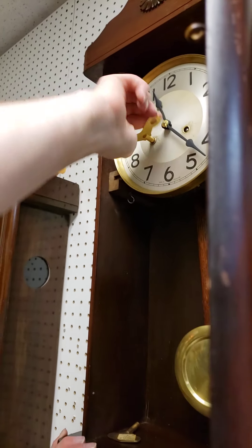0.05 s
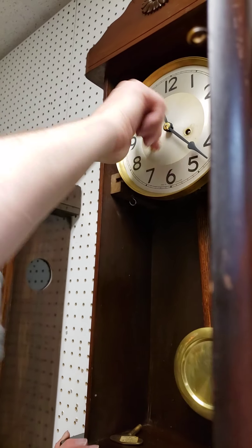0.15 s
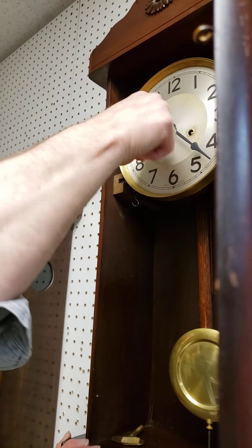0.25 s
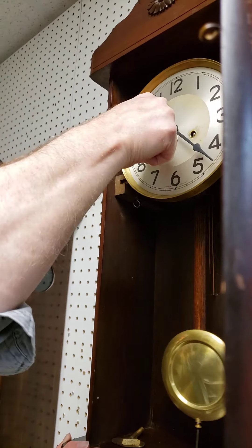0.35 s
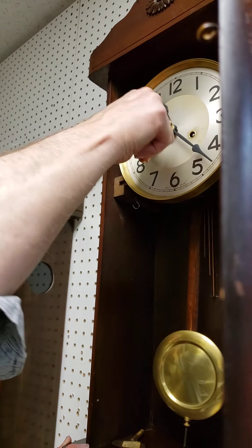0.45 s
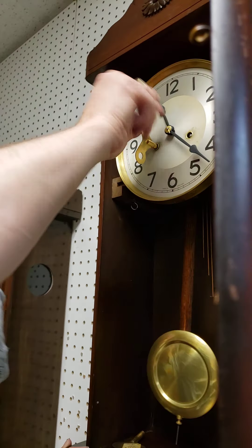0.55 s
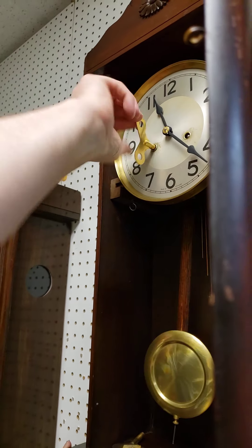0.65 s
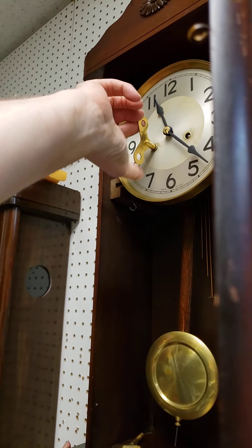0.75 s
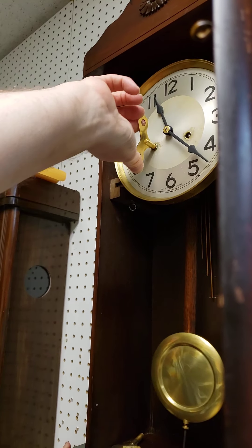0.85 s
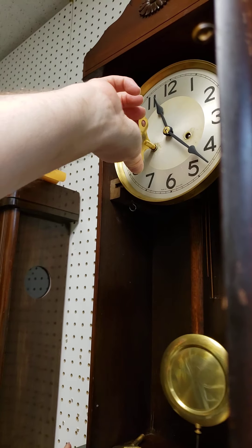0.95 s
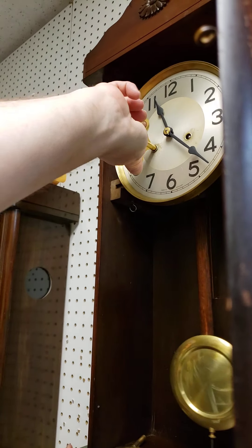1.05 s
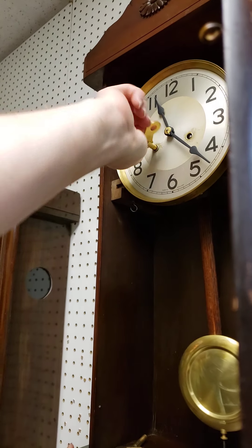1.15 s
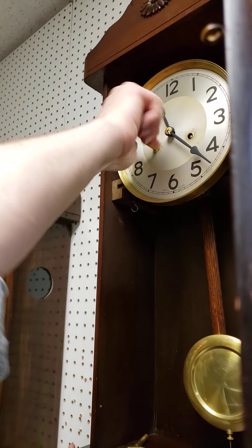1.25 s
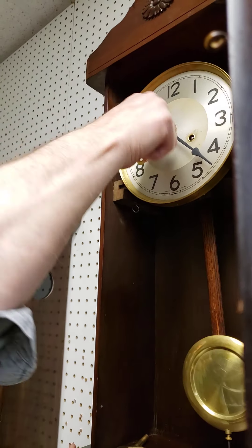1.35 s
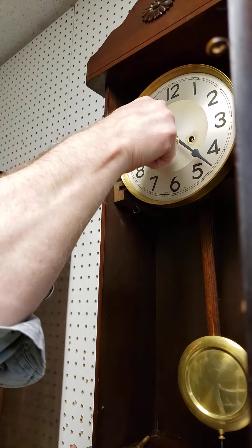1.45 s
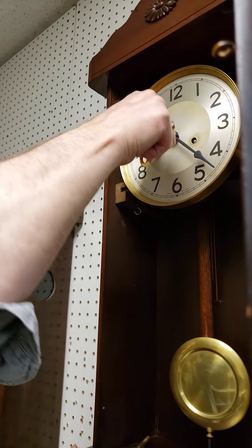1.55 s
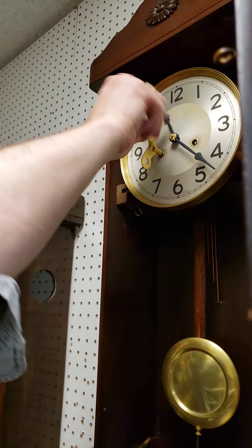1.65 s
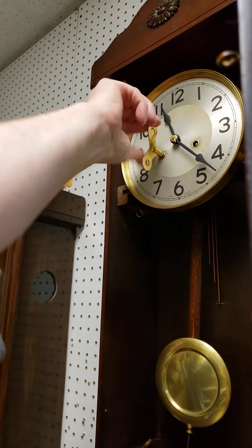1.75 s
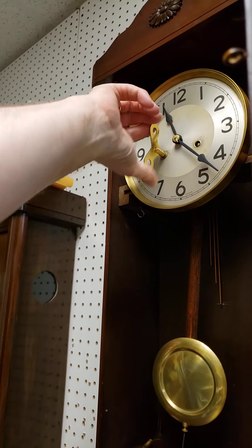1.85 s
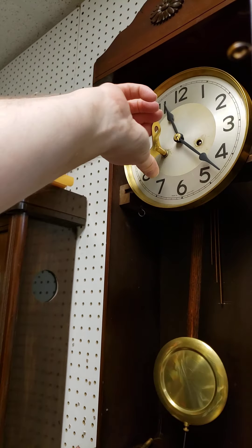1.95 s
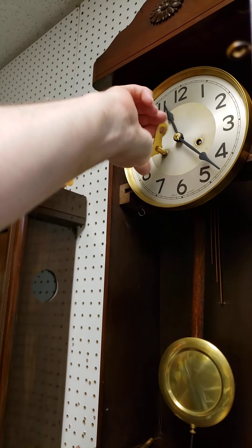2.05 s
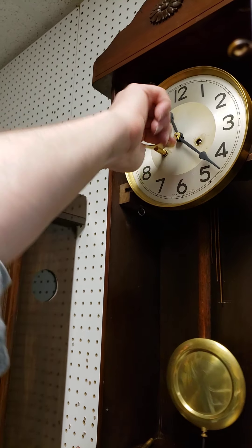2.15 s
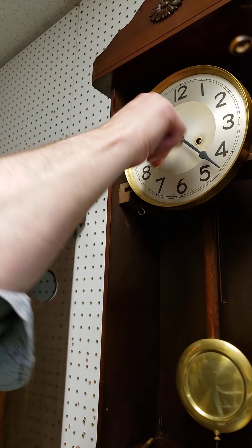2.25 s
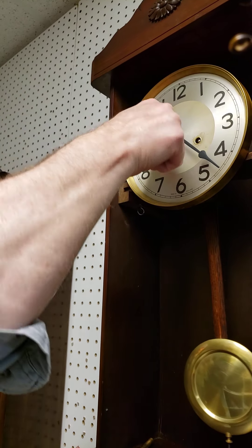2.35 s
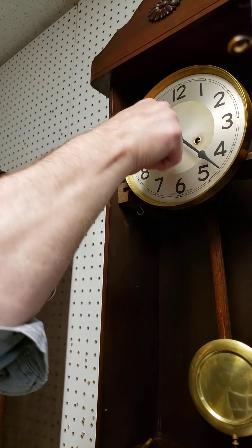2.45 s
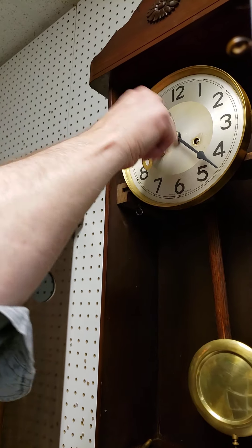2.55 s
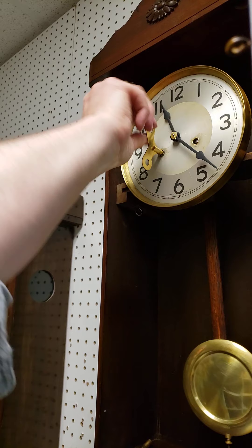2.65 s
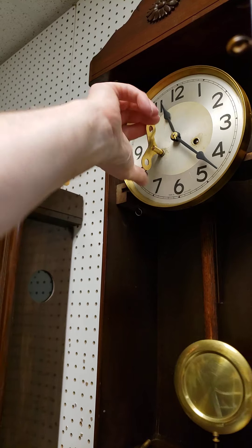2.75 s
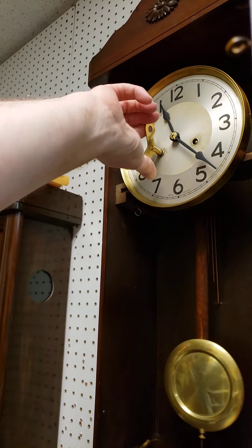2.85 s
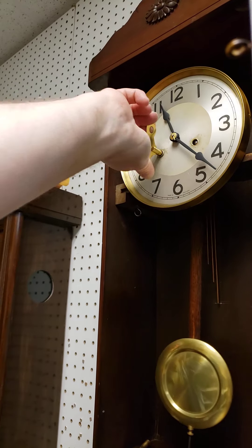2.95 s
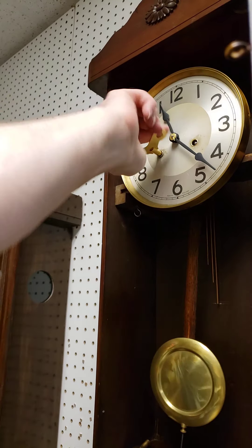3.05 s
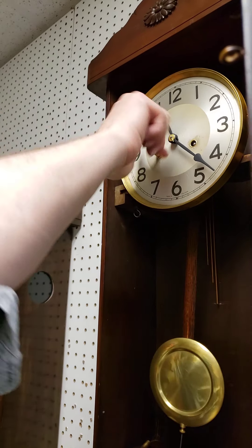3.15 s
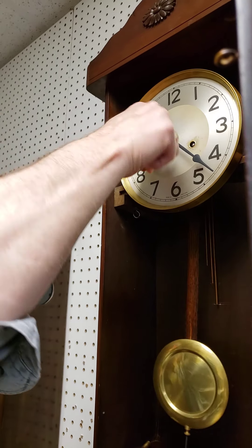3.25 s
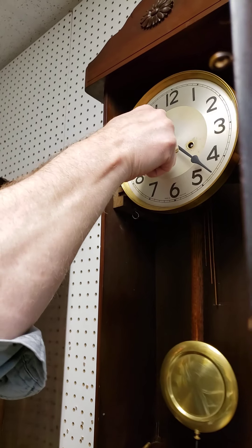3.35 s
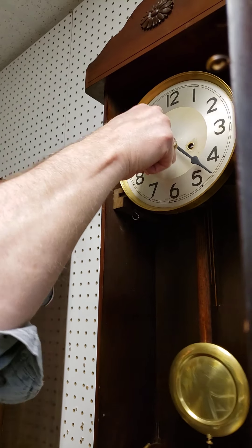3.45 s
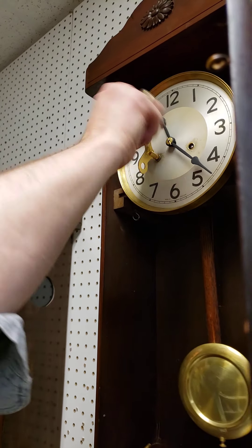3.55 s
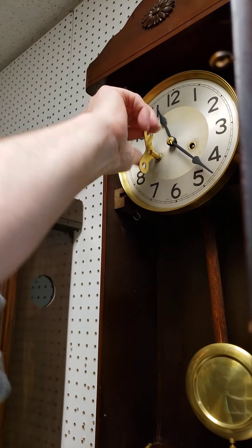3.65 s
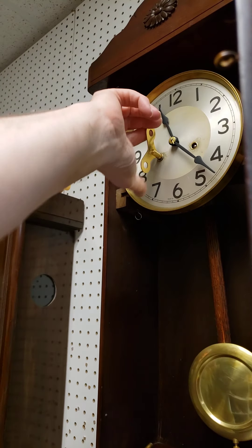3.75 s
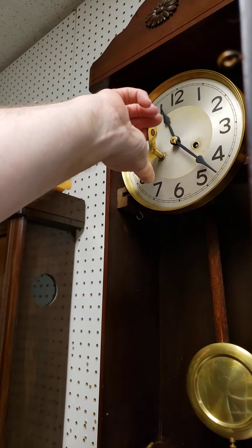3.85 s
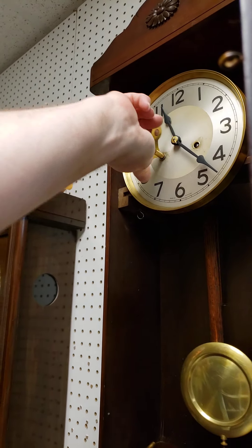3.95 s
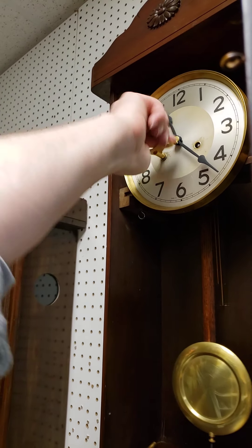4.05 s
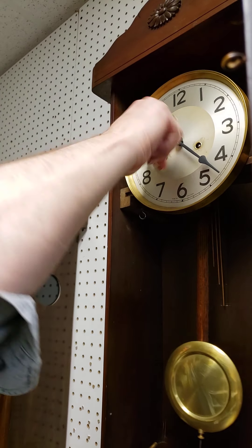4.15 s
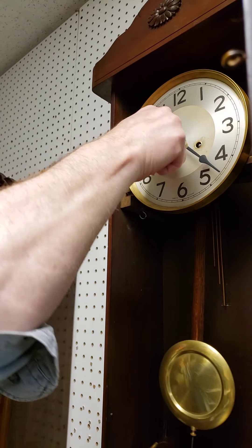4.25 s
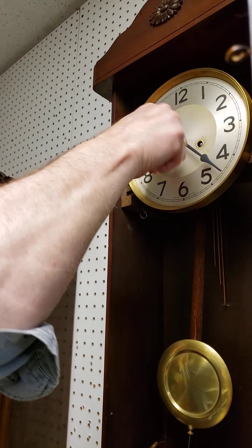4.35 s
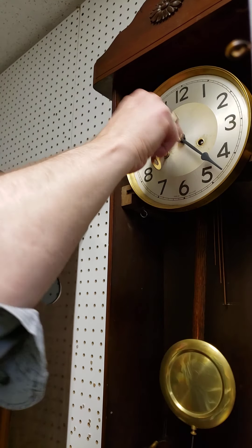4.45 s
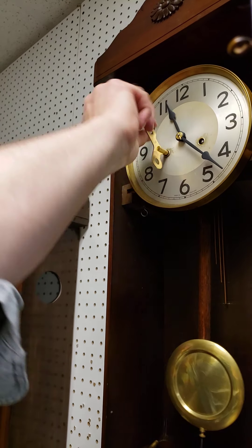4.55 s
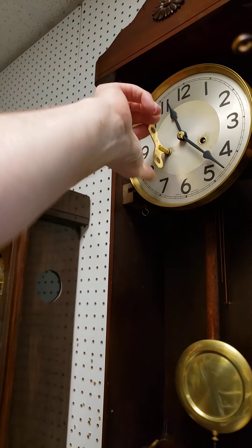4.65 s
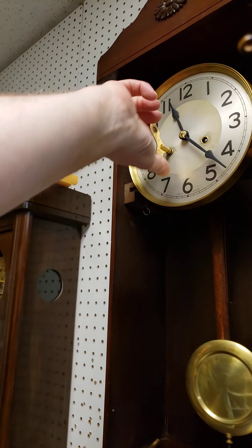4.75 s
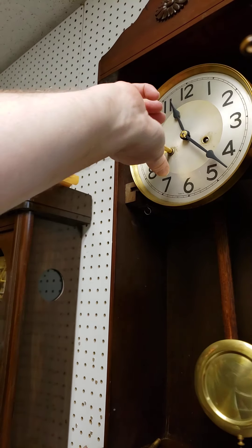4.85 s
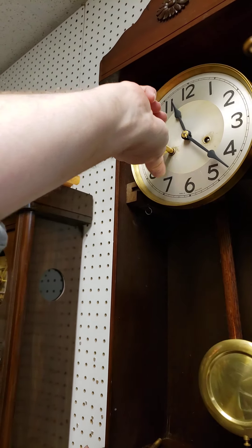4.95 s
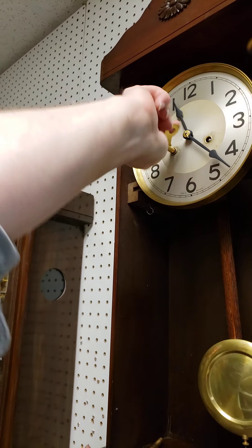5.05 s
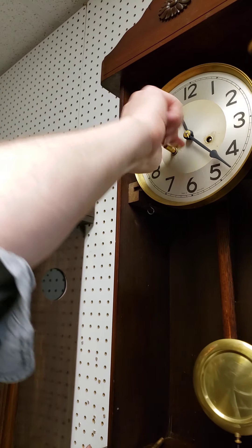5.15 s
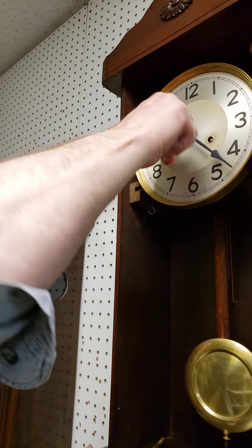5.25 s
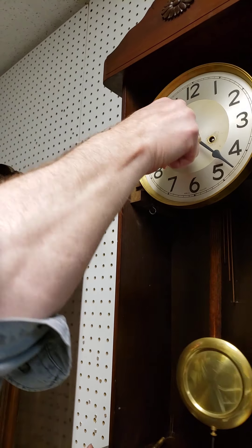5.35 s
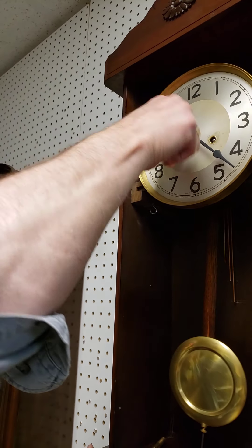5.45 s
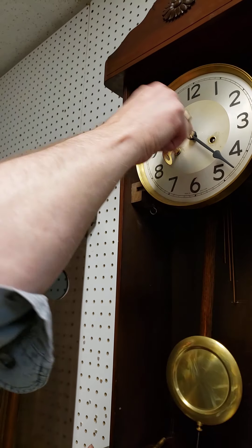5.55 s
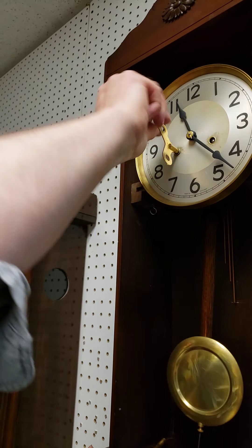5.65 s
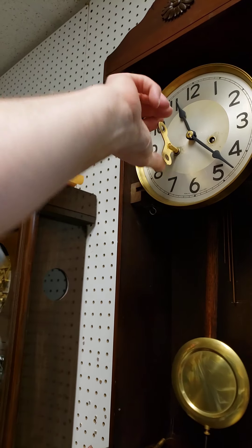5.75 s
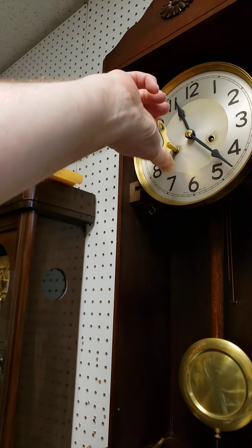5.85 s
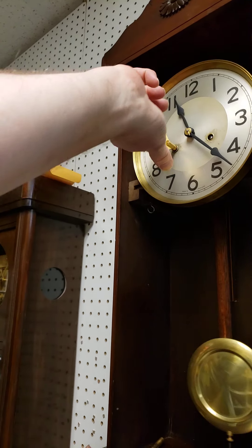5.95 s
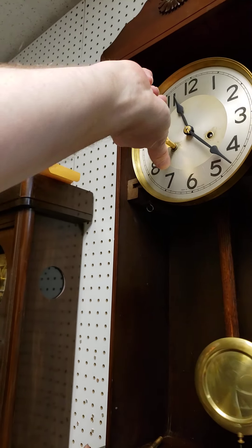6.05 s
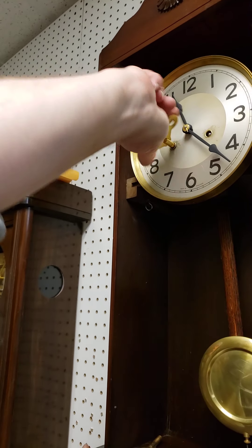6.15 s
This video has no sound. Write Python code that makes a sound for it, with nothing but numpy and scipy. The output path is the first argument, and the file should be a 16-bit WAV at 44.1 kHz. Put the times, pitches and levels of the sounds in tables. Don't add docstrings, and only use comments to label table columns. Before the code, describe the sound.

Close stereo sound of a wooden wall clock being wound by hand in a quiet room with a faint low hush. A soft rub and grip on the brass key, then the first burst of nine crisp metallic ratchet clicks runs from 0.1 to 0.35 seconds, about thirty clicks per second, the last one slightly delayed. Similar bursts follow at 1.2-1.46, 2.15-2.4, 3.1-3.4, 4.07-4.28 and 5.08-5.36. Each click is bright and steely over a small hollow wooden knock, stronger on the left. After each burst the hand lets go and regrips: dull thumps and brassy ticks near 0.48, 1.6, 2.5, 3.5, 4.45 and 4.68, the hardest knock around 5.54. Skin brushes and tiny fuzzy squeaks fill the gaps, with low rumble and creaking as the arm leans on the case. It ends just past 6 seconds with light handling.

```python
import sys
import numpy as np
from scipy import signal
from scipy.fft import rfft, irfft, next_fast_len
from scipy.io import wavfile
from scipy.ndimage import uniform_filter1d

SR = 44100
rng = np.random.default_rng(int(sys.argv[2]) if len(sys.argv) > 2 else 0)


def transcribe(signal):
    frames = np.atleast_2d(signal).T
    limited = np.clip(frames, -1, 1)
    pcm = np.round(limited * 32767).astype(np.int16)
    wavfile.write(sys.argv[1], SR, pcm)


def level_to_linear(level):
    exponent = np.asarray(level, float) / 20
    return 10 ** exponent


N = 272979
LONG = next_fast_len(N + SR // 2, True)
HZ = np.fft.rfftfreq(LONG, 1 / SR)


def evened(x):
    return x / np.sqrt(np.mean(x ** 2) + 1e-20)


def read(points, hz):
    f, value = np.transpose(points)
    return np.interp(np.log(hz + 1), np.log(f + 1), value)


def coloured(x, points):
    gain = level_to_linear(read(points, HZ))
    return irfft(rfft(x, LONG) * gain / np.sqrt(np.mean(gain ** 2)), LONG)[:N]


def body(x, modes):
    t = np.arange(4096) / SR
    ring = np.zeros(len(t))
    for k, (hz, width, db) in enumerate(modes):
        decay = np.exp(-np.pi * width * t)
        ring += (-1) ** k * level_to_linear(db) * np.sqrt(width) * decay * np.sin(2 * np.pi * hz * t)
    return signal.oaconvolve(x, ring / np.linalg.norm(ring))[:N]


def strikes(times, dbs, shapes):
    out = np.zeros(N + SR)
    for s, db, shape in zip(times, dbs, shapes):
        at = round(s * SR)
        out[at:at + len(shape)] += level_to_linear(db) * shape
    return out[:N]


def gritty(spread_db, per_s, size=N):
    happens = rng.random(size) < per_s / SR
    sizes = level_to_linear(spread_db * np.minimum(rng.exponential(1, size), 5)) * happens
    return evened(sizes * rng.standard_normal(size))


def partly_same(a, b, same):
    return same * a + np.sqrt(1 - same ** 2) * b


def strokes(rows, lag_s, rise_s, sag_db_per_s, fall_db_per_s):
    start, length, db, over_db = np.transpose(rows)[..., None]
    coarse = np.arange(0, N, 64)
    t = coarse / SR - start - lag_s
    loss_db = sag_db_per_s * np.maximum(t, 0) + fall_db_per_s * np.maximum(t - length, 0)
    held = np.clip(t / rise_s + 1, 0, 1) * level_to_linear(db - loss_db)
    layers = (held, held * level_to_linear(over_db))
    return [np.interp(np.arange(N), coarse, np.sqrt((e ** 2).sum(0))) for e in layers]


# pitch_hz, level_db
HUSH = [(18, -21), (30, -1), (174, -3.5), (600, -13), (1130, -29), (1220, -23), (1670, -30), (8740, -43.5),
        (16000, -31)]


def hush():
    a, b = rfft(rng.standard_normal((2, LONG)))
    likeness = [(60, 0.46), (500, 0.81), (2000, 0.51), (16000, .2)]  # pitch_hz, coherence
    same = np.clip(read(likeness, HZ), 0, 1)
    pair = np.array([a, level_to_linear(-4.0) * partly_same(a, b, same)])
    return level_to_linear(-69.5) * evened(irfft(pair * level_to_linear(read(HUSH, HZ)), LONG)[:, :N])


# start_s, length_s, dull_db, bright_over_dull_db
RUBS = [(0, .1, -78, 0), (.43, 0.34, -76, 1), (1.15, .05, -75, 1), (1.54, 0.088, -90, 0),
        (1.66, 0.13, -70.5, 3), (2.05, 0.077, -86.5, -6), (2.5, 0.23, -74, -1), (2.68, 0.073, -75, 7.5),
        (2.82, 0.16, -83.5, 0), (3.47, .15, -71, -2), (3.62, 0.059, -79.5, 7), (3.7, 0.075, -74, 6.5),
        (3.85, 0.063, -83.5, -9), (4.43, 0.11, -60.5, -10), (4.55, 0.34, -80, 5), (5.46, 0.11, -69.5, -4),
        (5.62, 0.24, -77, 4), (5.9, .29, -76, -5.5)]
# pitch_hz, level_db (per Hz)
DULL = [(410, -33), (700, -7), (1910, -29.5), (5960, -15.5), (7270, -12.5), (8500, -43), (11000, -64.5),
        (18700, -120)]
BRIGHT = [(4710, -38.5), (8000, -21.5), (10300, -15.5), (11800, -6.5), (16000, -2)]


def skin_rubs():
    dull, bright = strokes(RUBS, lag_s=0, rise_s=.03, sag_db_per_s=-1.0, fall_db_per_s=155)
    dull = dull * gritty(spread_db=5.0, per_s=5000)
    bright = bright * gritty(spread_db=2.5, per_s=3800)
    return level_to_linear(-1.5) * coloured(dull, DULL) + level_to_linear(2.5) * coloured(bright, BRIGHT)


# start_s, length_s, rumble_db, groan_over_rumble_db
LEANS = [(.06, 0.32, -60.5, 4), (.47, 0.09, -56.5, -1.5), (.7, 0.16, -63.5, -5.5), (1.2, 0.16, -66.5, 13),
         (1.58, 0.23, -56.5, 0), (2.1, 0.27, -58, 5.5), (2.5, 0.23, -54.5, -6.5), (3.08, 0.37, -58.5, -0.5),
         (3.45, 0.31, -57.5, 0), (4.05, 0.28, -58, -8.5), (4.44, 0.085, -52, 0), (4.66, 0.31, -67, -2.5),
         (5.1, 0.23, -68, 13), (5.53, 0.09, -50, -4.5), (5.72, 0.027, -59, 4)]
# pitch_hz, level_db (per Hz)
RUMBLE = [(15, -30.5), (30, -12), (45, -7), (62, 0.5), (80, -1), (105, -4.5), (150, -7.5), (200, -31.5),
          (300, -61)]
# pitch_hz, width_hz, level_db
CASE = [(128, 37, -8.5), (201, 16, -5.5), (248.6, 17, -1), (282, 57, -4.5), (318, 30, -4), (393, 31, -8)]
RAP = [(496, 110, -3), (600, 97, 1.5), (690, 59, -3), (814, 160, -4.5), (1020, 46, -11), (1180, 120, -14.5)]


def arm_load():
    shake, creak = strokes(LEANS, lag_s=.03, rise_s=0.048, sag_db_per_s=10.5, fall_db_per_s=93.5)
    rumble = coloured(shake * gritty(spread_db=3.5, per_s=670), RUMBLE)
    strain = creak * gritty(spread_db=2.0, per_s=1000)
    groan = body(strain, CASE) + level_to_linear(-11) * body(strain, RAP)
    return rumble + groan


# start_s, thud_db, rap_db, brass_db
GRIPS = [(0.056, -42.5, -48, -67), (0.459, -45, -50, -57), (1.166, -55, -52.5, -71.5),
         (1.996, -47.5, -65, -81), (2.097, -62, -46.5, -61), (2.523, -53, -50, -59.5),
         (2.776, -44.5, -62.5, -80), (3.055, -45, -49, -65), (4.021, -58, -48.5, -63),
         (4.428, -53.5, -47, -56), (4.639, -39.5, -54, -55), (4.677, -29.5, -39, -47.5),
         (5.021, -49, -45, -58), (5.555, -29, -63, -44), (5.583, -67, -63.5, -62), (5.976, -88, -75.5, -70),
         (6.146, -48, -49, -64), (1.792, -36, -48.5, -56.5), (0.703, -42.5, -47, -53.5),
         (3.607, -71.5, -62, -59)]
# start_s, thud_db, rap_db, brass_db
JOLTS = [
    (0.48, -29.5, -39.5, -47.5),
    (0.751, -39.5, -44.5, -55.5),
    (1.592, -35, -39.5, -52),
    (2.534, -46, -45, -49),
    (2.578, -52, -74, -67),
    (2.987, -59, -62, -64),
    (3.476, -38.5, -40, -48),
    (4.456, -29.5, -35, -41.5),
    (5.512, -37, -47, -60),
    (5.54, -33, -33, -40.5),
]
# start_s, thud_db, rap_db, brass_db
BRUSHES = [(1.135, -52.5, -59, -68.5), (1.573, -56.5, -56.5, -78.5), (1.687, -43, -52, -77),
           (1.702, -42, -71, -60), (2.652, -63.5, -89, -71), (3.589, -54, -56, -60.5),
           (3.69, -47, -67, -71), (4.538, -38, -65.5, -53), (4.825, -48.5, -52, -61.5),
           (5.786, -42.5, -62, -87), (5.849, -61, -53.5, -61), (6.059, -75, -72, -63)]
# glint_over_brass_db, scuff_length_s
TOUCH = [
    (-12.5, 0.019),
    (-2, 0.02),
    (1.5, 0.019),
]
# pitch_hz, level_db (per Hz)
TICK = [(590, -26), (1000, 0.5), (1440, -4), (2200, -9.5), (2460, -7), (3010, -4), (3560, -8),
        (9000, -12.5), (11700, -34.5), (19800, -120)]


def touches():
    s, thud_db, rap_db, tick_db = np.transpose(GRIPS + JOLTS + BRUSHES)
    glint_db, length = np.repeat(TOUCH, [len(GRIPS), len(JOLTS), len(BRUSHES)], axis=0).T
    t = np.arange(4000) / SR
    scuffs = []
    for d in length:
        fade = np.exp(-t / 0.0016) + np.exp(-(t / np.clip(d, .003, .06)) ** 2)
        scuffs.append((1 - np.exp(-t / 0.00077)) * fade)
    ticks = [np.exp(-t / 0.0051) + level_to_linear(-7.5) * scuff for scuff in scuffs]
    thud = body(strikes(s, thud_db - 7.5, scuffs) * gritty(spread_db=3.5, per_s=4000), CASE)
    rap = body(strikes(s, rap_db - 4.5, scuffs) * gritty(spread_db=-2.0, per_s=2400), RAP)
    tick = coloured(strikes(s, tick_db - 1.5, ticks) * gritty(spread_db=4.0, per_s=14000), TICK)
    glint = strikes(s, tick_db + glint_db + 3.5, ticks) * gritty(spread_db=-3.0, per_s=16000)
    return thud + rap, tick + coloured(glint, BRIGHT)


def struck_body(modes, hz, blur, count, vary_db, vary):
    centre, width, db = np.transpose(modes)[:, None, :, None]
    luck = evened(uniform_filter1d(rng.standard_normal((count, len(modes), 2)), size=3, axis=0))
    centre = centre * (1 + vary * luck[..., :1])
    strength = level_to_linear(2 * (db + vary_db * luck[..., 1:]))
    power = strength * width / ((blur * width / 2) ** 2 + (hz - centre) ** 2)
    log_gain = .65 * np.log(power.sum(1))
    mirrored = np.concatenate([log_gain, log_gain[:, -2:0:-1]], 1)
    turn = signal.hilbert(mirrored).imag[:, :len(hz)]
    return np.exp(log_gain - 1j * turn)


# start_s, strength_db, plate_over_strength_db
TEETH = [(0.1071, -15.5, -23.5), (0.1358, -15, -23.5), (0.1615, -15.5, -23.5), (0.187, -15, -23),
         (0.215, -16, -20), (0.2387, -14.5, -18), (0.2667, -15, -19), (0.2968, -14, -19.5),
         (0.3417, -13, -20), (1.2098, -15, -24), (1.2419, -14, -25), (1.2687, -15, -23.5),
         (1.2974, -13, -24), (1.328, -13.5, -24.5), (1.353, -13.5, -21.5), (1.3806, -12, -24.5),
         (1.4114, -12, -24), (1.4583, -14, -21.5), (2.1462, -16, -16.5), (2.1765, -12, -24),
         (2.203, -16.5, -20), (2.2345, -13, -21), (2.265, -10, -24), (2.2932, -11, -20),
         (2.3252, -15, -19.5), (2.357, -11, -20.5), (2.4145, -13, -19.5),
         (3.1011, -14.5, -19.5), (3.1321, -12.5, -26), (3.1605, -13.5, -28), (3.1911, -13.5, -28),
              (3.222, -12.5, -24), (3.2522, -12.5, -24.5), (3.2842, -11.5, -31), (3.317, -12.5, -24.5),
              (3.3902, -11.5, -25.5), (4.0713, -15.5, -24.5), (4.098, -14.5, -25.5), (4.126, -11.5, -27),
              (4.1535, -15, -24), (4.1813, -11.5, -28), (4.2125, -13, -21.5), (4.2438, -14, -21),
              (4.2814, -12, -20), (5.078, -13, -21), (5.1157, -9.5, -23.5), (5.1465, -13, -27),
              (5.1838, -13, -26), (5.215, -14.5, -27.5), (5.2458, -14, -26), (5.2783, -11.5, -23.5),
              (5.3183, -11.5, -24), (5.3616, -13, -23.5)]
# spring_over_strength_db, panel_over_strength_db
PARTS = [(1, 1.5), (0.5, 1.5), (0.5, 4), (2.5, 1.5), (0, 4), (0.5, -2.5), (2.5, 2.5), (-1.5, -1), (-3, -3),
         (-2.5, 1), (0.5, -3.5), (1, -1.5), (-3, -3), (0, 0.5), (0.5, 4.5), (0.5, -4), (-1.0, -4),
         (1.5, -2.0), (1, 4.5), (1.5, 2.5), (1.5, 5), (0.5, 1.5), (-1.5, -0.5), (1, 0.5), (1.5, 2),
         (-1.5, -0.5), (0, -7.5), (1, 2), (1.5, -2), (1.0, -0.5), (0, 0.5), (0.0, 0.5), (-1, 1.5),
         (-1.5, 1), (0.5, -3), (1.5, -2.5), (3, 2), (4, 0.5), (-0.5, 0), (4, 3.5), (-1.5, 1), (0.5, 0),
         (-1.0, 0), (0.5, -0.5), (-0.0, -3.5), (-0.5, -6.5), (2, -4), (2, -0.5), (1, 1.5), (0.5, 4.5),
         (-0.5, -1.5), (-1, -1.5), (1, -3)]
# pitch_hz, width_hz, level_db
STEEL = [(9400, 700, -19), (10400, 1000, -16), (11700, 600, -10), (12500, 600, -9), (13700, 500, -5),
         (14600, 600, -6), (15350, 600, 0)]
SPRING = [(4510, 2400, -6.5), (4620, 190, -4), (5630, 240, -6.5), (6400, 150, -7.5), (6670, 1300, -3),
          (7680, 370, -4)]
PLATE = [(1170, 280, -24.5), (1407, 130, -4.5), (1590, 340, -5), (2080, 100, -3), (2370, 100, -9),
         (2790, 220, -2.5), (3027, 220, 0), (3286, 150, -5)]
PANEL = [(238, 86, -10.5), (352, 61, -19.5), (483, 90, -10.5), (583, 100, 6), (674, 110, 0.5),
         (836, 120, 2), (970, 71, -10)]
# pitch_hz, coherence
SAME = [(60, .96), (650, .86), (1100, .55), (2300, .72), (5000, .45), (12000, .45)]


def ratchet():
    s, steel_db, plate_db = np.transpose(TEETH)
    spring_db, panel_db = np.transpose(PARTS)
    t, hz = np.arange(8192) / SR, np.fft.rfftfreq(8192, 1 / SR)
    echo_s = .0145 + .004 * rng.random((len(s), 1))
    echo_db = 1.5 * rng.standard_normal((len(s), 1))
    echo = level_to_linear(echo_db) * np.exp(-((t - echo_s) / .002) ** 2)
    same = np.clip(read(SAME, hz), 0, 1)
    hidden = level_to_linear(read([(1500, -1.5), (2100, 1), (2700, 0), (6000, 0.5), (12000, 0.0)], hz))
    back_wall = level_to_linear(.5) / (1 + (hz / 1600) ** 2) * np.exp(-2j * np.pi * hz * .00925)
    blow = np.exp(-2j * np.pi * hz * .002) * (1 - back_wall)
    drops = 0
    # modes, over_steel_db, trim_db, after_ring_db, after_ring_t60_s, chatter_s, rebound_db, clean_share
    for modes, over_db, trim_db, ring_db, t60, chatter, rebound_db, clean in (
            (STEEL, 0, 1, -18, .2, .0031, -20, 0),
            (PLATE, plate_db, 10, -18, .23, .0034, -21, .45),
            (SPRING, spring_db, -8, -17.5, .21, .0031, -19, 0),
            (PANEL, panel_db, -19, -20, .22, .005, -30, .85)):
        slap = 0.69 * (1 - np.exp(-t / 0.00092)) * np.exp(-(t / chatter / 1.53) ** 1.3)
        slap = slap + 0.15 * np.exp(-((t - .003) / 0.0012) ** 2)
        decay = level_to_linear(ring_db - 60 * t / t60) * (1 - np.exp(-t / 0.00054))
        after = level_to_linear(rebound_db) * echo + decay * np.cos(np.pi / 2 * t / t[-1])
        for force, blur, far_gain, share in ((slap, 1, hidden, clean), (after, 4.5, 1, 0)):
            near, far = rfft(force * gritty(0.84, 32000, size=(2, len(s), len(t))))
            near = (1 - share) * near + share * np.linalg.norm(slap) * blow
            far = (1 - share / 2) * far
            pair = np.array([near, partly_same(near, far, same)])
            pair = pair * struck_body(modes, hz, blur, count=len(s), vary_db=2.5, vary=0.006)
            force_power = np.sum(force ** 2, -1, keepdims=True)
            pair = pair / np.sqrt(np.mean(abs(pair) ** 2, 2, keepdims=True) / force_power)
            pair[1] *= far_gain
            drops = drops + level_to_linear(steel_db + over_db + trim_db)[:, None] * pair
    return np.array([strikes(s - .0011, 0 * s, port) for port in irfft(drops)])


# start_s, rap_db, thump_over_rap_db, deep_over_first_mode_db
BLOWS = [(0.463, -47, -2, 3), (0.481, -40, -1, -0.5), (0.714, -49.5, 0.5, 2.5), (0.771, -52, 1, -2.5),
         (1.161, -46, -3, 1), (1.579, -47.5, 0.5, 0.5), (1.597, -41, 0, 2), (1.782, -50, 0.5, -1),
         (1.806, -47, 3.5, 1), (2.102, -49, -8.5, -0.5), (2.53, -41.5, -4, -6.5), (2.543, -37, -3, -3),
         (2.776, -57.5, 8.5, 0), (3.052, -50, 2.5, 1), (3.479, -43, 1.5, 0), (3.718, -56.5, 8.5, -1),
         (3.76, -53.5, -1, -2), (4.029, -50.5, -7, 3.5), (4.433, -44, -3, 1), (4.461, -39, 1.5, 1),
         (4.489, -38.5, -4.5, -1.5), (4.677, -36, -5.5, -2.5), (4.711, -46.5, -4, -3.5),
         (5.021, -44.5, -8.5, 2.5), (5.516, -46, -0.5, 0), (5.542, -28.5, -12.5, 4.5),
         (5.558, -40, -5.5, -2), (5.793, -57.5, 13, -1), (6.153, -42, -9, 2)]
# pitch_hz, rise_s, fade_s, level_db
THUMP = [
    (329, 0.0017, .014, -1),
    (245.4, 0.012, .02, 1.5),
    (199.1, 0.028, 0.029, 1.5),
    (137, 0.021, 0.027, -8.5),
]


def blows():
    s, rap_db, over_db, deep_db = np.transpose(BLOWS)
    t = np.arange(6000) / SR
    detune = 1 + 0.013 * rng.standard_normal((len(s), len(THUMP), 1))
    hz, rise, fade, db = np.transpose(THUMP)[..., None]
    swell = level_to_linear(db) * (1 - np.exp(-t / rise)) * np.exp(-t / fade)
    modes = swell * np.sin(2 * np.pi * hz * detune * t)
    thumps = modes[:, 0] + level_to_linear(deep_db)[:, None] * modes[:, 1:].sum(1)
    push = signal.windows.hann(20) / 10
    rap = body(strikes(s, rap_db + 23, [push] * len(s)), RAP)
    return strikes(s, rap_db + over_db + 5, thumps) + rap


# start_s, length_s, start_hz, end_hz, level_db
SQUEAKS = [(0.626, 0.077, 2480, 2250, -70), (1.139, 0.013, 2820, 2790, -71),
           (1.673, 0.024, 2080, 2550, -62), (1.757, 0.036, 2130, 2920, -59.5),
           (2.607, 0.026, 2900, 2890, -81.5), (2.711, 0.09, 2220, 2880, -70),
           (3.591, 0.039, 2730, 2840, -88), (3.717, 0.08, 2770, 2830, -77), (3.752, 0.048, 2476, 2333, -64),
           (4.799, 0.073, 2390, 2475, -65), (5.694, 0.082, 2620, 2800, -73.5),
           (5.781, 0.027, 2470, 2770, -75.5), (5.844, 0.059, 2360, 2260, -66.5),
           (6.063, 0.047, 2150, 2250, -82)]


def squeaks():
    shapes = []
    for s, length, start_hz, end_hz, db in SQUEAKS:
        pitch_hz = np.linspace(start_hz, end_hz, round(length * SR))
        turns = 2 * np.pi * np.cumsum(pitch_hz) / SR
        count = len(turns)
        fuzz = uniform_filter1d(rng.standard_normal((4, count)), size=120)
        fuzz = fuzz * abs(uniform_filter1d(rng.standard_normal(count), size=260))
        tone = fuzz[0] * np.cos(turns) + fuzz[1] * np.sin(turns)
        half = fuzz[2] * np.cos(turns / 2) + fuzz[3] * np.sin(turns / 2)
        fade = signal.windows.tukey(count, .3) * np.linspace(1.3, .5, count)
        shapes.append(evened(tone + level_to_linear(-4) * half) * fade)
    s, *_, db = np.transpose(SQUEAKS)
    return strikes(s, db, shapes)


# pitch_hz, t60_s
RING_OUT = [(200, 0.15), (530, 0.31), (1390, 0.29), (3680, 0.21), (9700, 0.18), (16000, 0.14)]


def ring_out(x, wet_db):
    noise = rng.standard_normal((2, SR // 2))
    hz, t, z = signal.stft(noise, SR, nperseg=256)
    same = np.clip(read(SAME, hz), 0, 1)[:, None]
    z[1] = partly_same(z[0], z[1], same)
    decay = level_to_linear(-60 * t / read(RING_OUT, hz)[:, None])
    tail = signal.istft(z * decay, SR, nperseg=256)[1]
    tail *= 1 - np.exp(-(np.arange(tail.shape[1]) / SR / 0.005) ** 2)
    tail = tail / np.linalg.norm(tail[0])
    wet = signal.fftconvolve(x * np.ones((2, 1)), tail, axes=1)[:, :N]
    return x + level_to_linear(wet_db) * wet


# pitch_hz, left_over_right_db
LEAN = [(60, 2), (300, 1.3), (600, 5), (1300, 3.5), (2500, 1.5), (4500, 9), (8500, 19), (11500, 15),
        (15500, 20)]
# pitch_hz, left_lead_radians
LEAD = [(60, 0), (400, .35), (800, 1.3), (1400, 3.3), (2100, 6.1), (2800, 12.6), (3450, 17), (16000, 46)]


def ports(pair):
    shadow = np.exp(-1j * read(LEAD, HZ)) / level_to_linear(read(LEAN, HZ))
    return np.array([pair[0], irfft(rfft(pair[1], LONG) * shadow, LONG)[:N]])


def scene():
    thud, tick = touches()
    metal = ring_out(level_to_linear(1.5) * ratchet(), wet_db=-10.5)
    touch = ring_out(tick + skin_rubs() + squeaks(), wet_db=-2.0)
    wood = ring_out(level_to_linear(-0.5) * (thud + blows() + arm_load()), wet_db=-7.5)
    return ports(metal + touch + wood) + hush()


def band_limit(x):
    return signal.sosfilt(signal.butter(12, 17140, fs=SR, output="sos"), x)


def record(dry):
    edge = signal.firwin(255, 15860, window=("kaiser", 3.5), fs=SR)
    mix = signal.oaconvolve(dry, edge[None], "same")
    return band_limit(mix)


dry = scene()
out = record(dry)
transcribe(out)
```